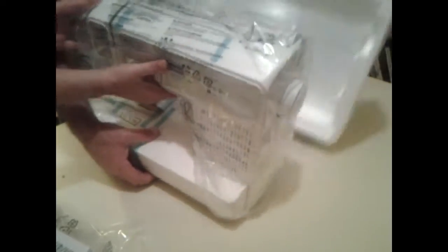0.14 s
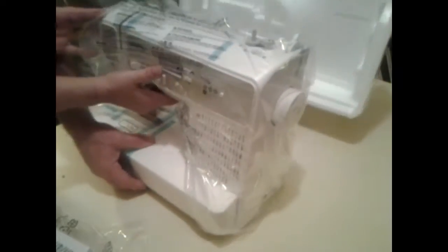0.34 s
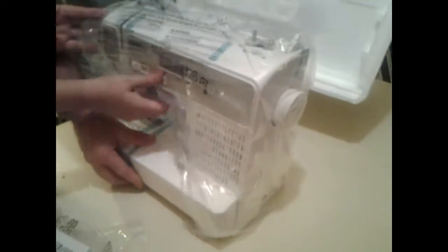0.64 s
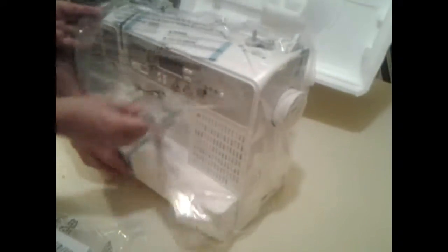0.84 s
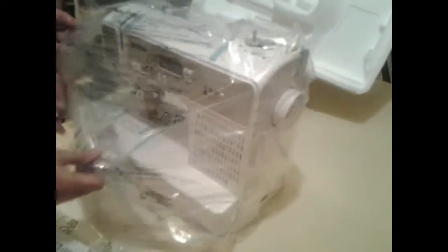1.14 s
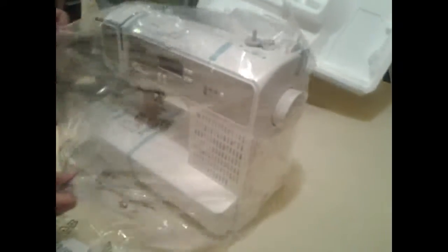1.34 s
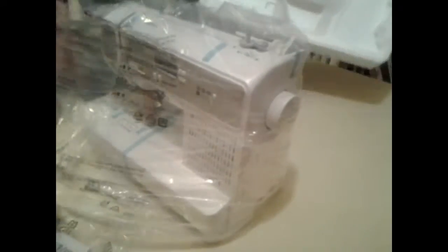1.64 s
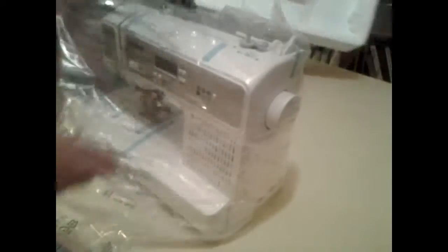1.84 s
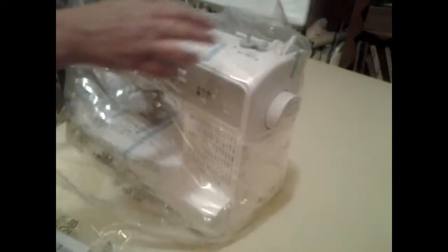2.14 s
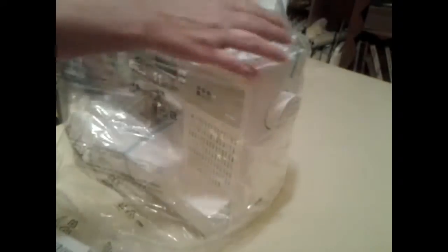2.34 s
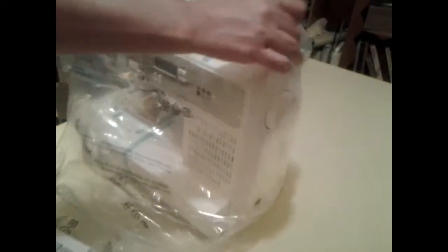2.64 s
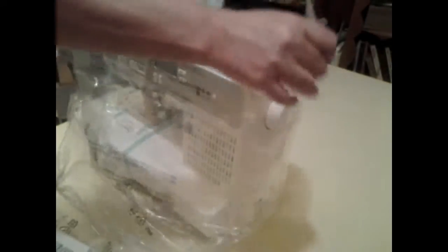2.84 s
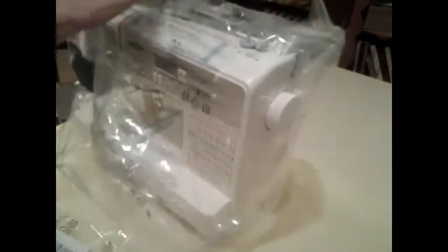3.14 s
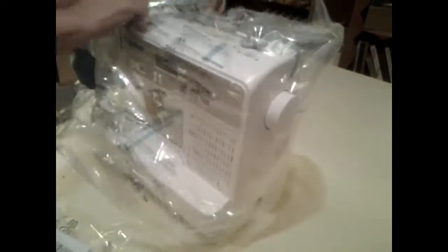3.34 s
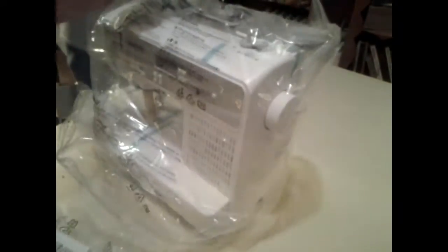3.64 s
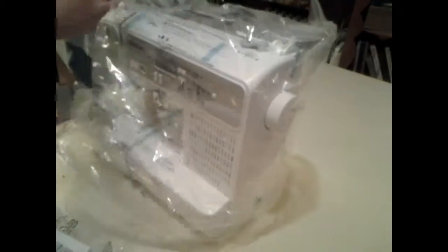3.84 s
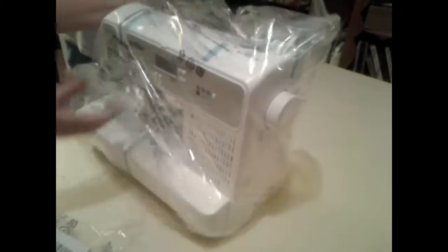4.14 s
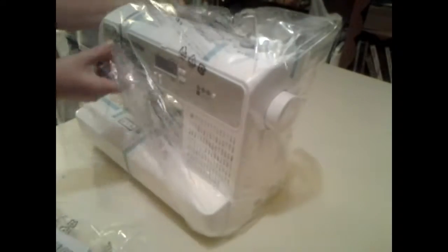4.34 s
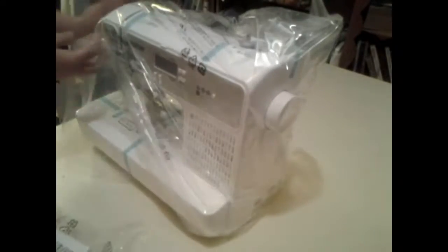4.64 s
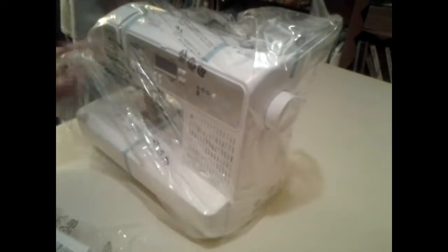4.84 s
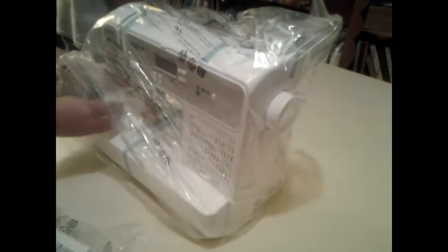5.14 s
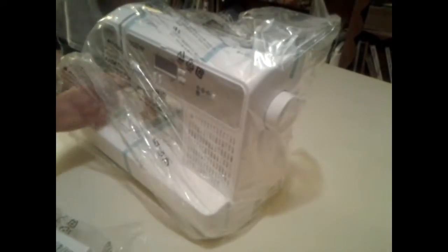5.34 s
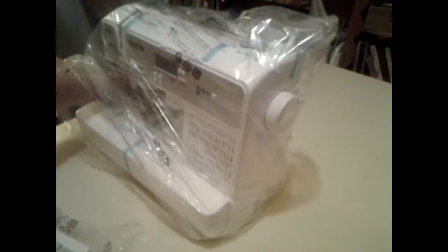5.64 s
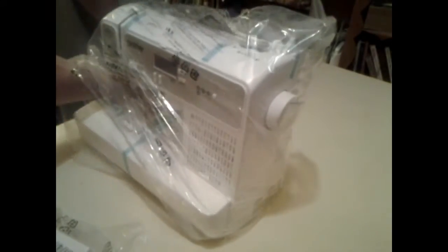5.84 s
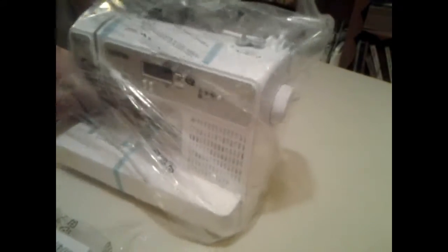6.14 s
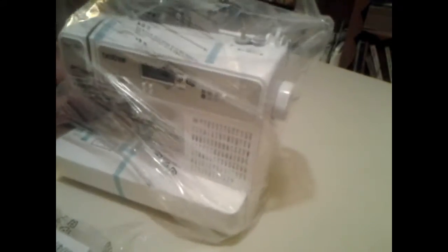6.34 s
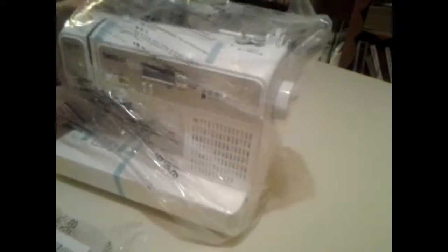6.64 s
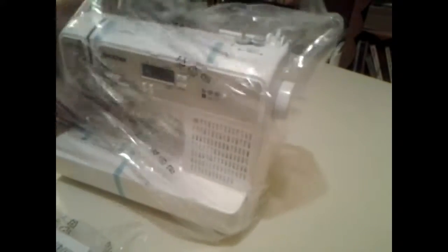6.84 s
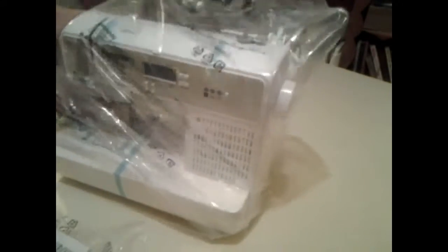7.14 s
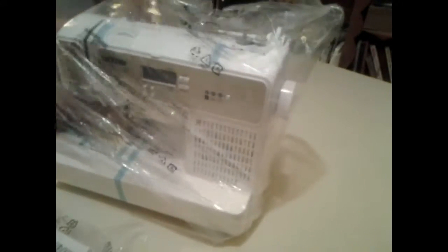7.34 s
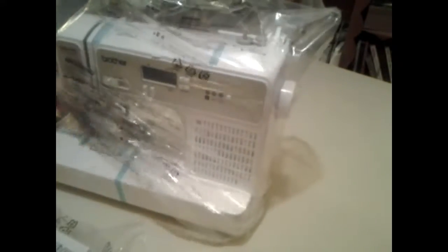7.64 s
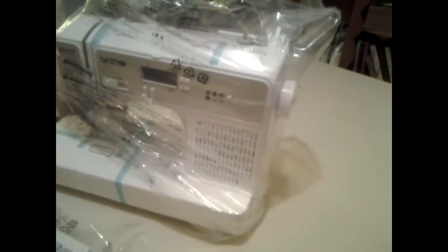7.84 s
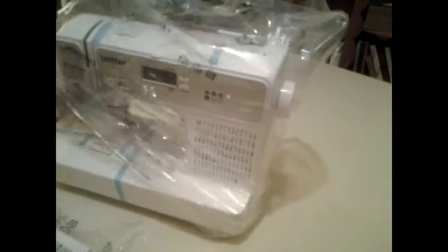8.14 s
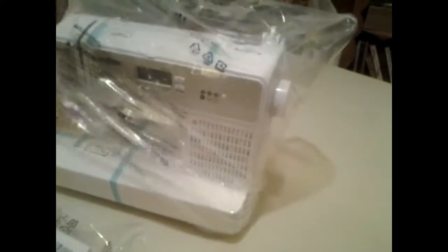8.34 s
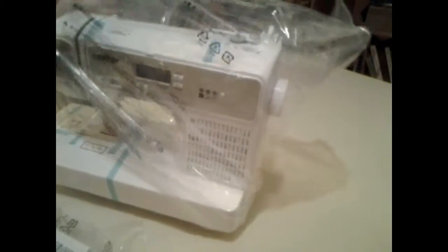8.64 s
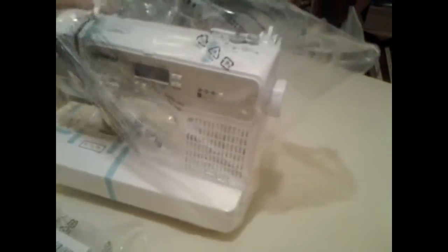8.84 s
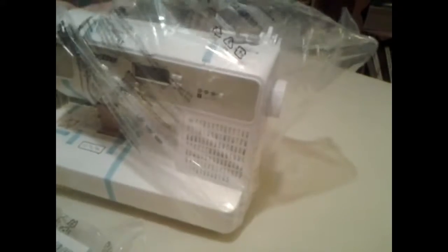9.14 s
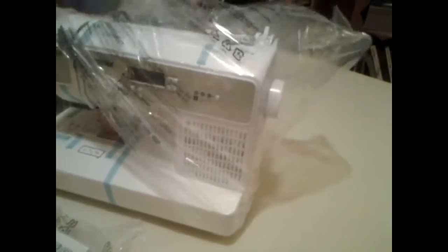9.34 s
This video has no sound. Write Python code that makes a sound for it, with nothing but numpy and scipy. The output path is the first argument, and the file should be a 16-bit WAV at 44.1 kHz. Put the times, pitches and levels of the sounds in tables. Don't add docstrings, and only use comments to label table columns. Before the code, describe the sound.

Hands tug a crinkly plastic bag off a heavy machine, its base thudding hollowly on the tabletop, ending with one loud taut pop.

```python
import sys
import numpy as np
from scipy import signal
from scipy.fft import rfft, irfft
from scipy.io import wavfile
from scipy.ndimage import uniform_filter1d

SR = 44100
rng = np.random.default_rng(int(sys.argv[2]) if len(sys.argv) > 2 else 0)


def amplitude_ratio(level_db):
    exponent = np.asarray(level_db, float) / 20
    return 10 ** exponent


def materialize(psi):
    bounded = np.clip(np.atleast_2d(psi).T, -1, 1)
    quanta = np.round(bounded * 32767).astype(np.int16)
    wavfile.write(sys.argv[1], SR, quanta)


N = 418950

# t/s, peak level/dB, deep modes/dB, upper modes/dB, hardness/dB
KNOCKS = [(0.119, -26.5, -33, 8, -1), (0.229, -13, -27, -15, -22), (0.234, -9.5, -7.5, -23, -12),
          (0.396, -30, 7, -4, -1), (4.013, -11.5, -14.5, -5, -25), (4.026, -9, -26, -9, -15),
          (4.398, -18, -15, -9, -27), (5.119, -5, -28.5, -15, -26), (5.151, -16.5, -39, 8, -20),
          (5.356, -7, -16.5, -3, -4.5), (5.380, -10.5, -28, -9, -16), (5.657, -26, -17, -2.5, -17),
          (6.162, -14.5, -22, -13.5, -28), (6.262, -0.5, -26, 2, -29), (6.274, 3.5, -29, -20, -19.5),
          (6.298, -16, -29, -13, -28), (6.947, -22.5, -4, -13, -24), (7.762, -2.5, -25, -13.5, -20.5),
          (7.775, -5, -29, -17, -20), (7.983, -12.5, -32, -16.5, -16), (7.996, -12, -31, -18, -36),
          (9.322, -25, -5, -18, 4), (9.336, -25, -14, -28, -6), (9.418, -32, -1.5, -9, -6)]
# f/Hz, level/dB, T60/s
TABLE = [(125, -14, 0.24), (185, -2.5, 0.065), (265.4, -1, 0.12), (323.6, -7, 0.24), (383.7, 4.5, 0.095),
         (446.2, 2.5, 0.18), (530, 0.5, 0.1), (608, 4.5, 0.081), (665.7, 2, 0.12), (744, 3.5, 0.033),
         (872, -0.5, 0.051), (1054, -10.5, 0.069), (1110, -24.5, 0.45), (1490, -25, 0.036)]


def band(x, hz, octaves):
    edges = np.clip(hz * 2 ** (np.array([-octaves, octaves]) / 2), 10, .45 * SR)
    return signal.sosfilt(signal.butter(2, edges, "bandpass", fs=SR, output="sos"), x)


def unit(x):
    return x / np.sqrt(np.mean(x ** 2))


def shape_db(points, hz):
    f, db = np.transpose(points)
    return np.interp(np.log(hz), np.log(f), db)


def walk(rate):
    k = int(SR / rate)
    steps = np.repeat(rng.standard_normal(N // k + 1), k)
    return unit(uniform_filter1d(uniform_filter1d(steps, k), k)[:N])


def ring(hz, db, t60, seconds):
    t = np.arange(int(seconds * SR))[:, None] / SR
    sign = (-1.) ** np.arange(len(hz))
    return sign * np.sin(2 * np.pi * hz * t) * amplitude_ratio(db - 60 * t / t60)


def add(out, s, x, db):
    i = int(s * SR)
    x = x[:N - i]
    out[i:i + len(x)] += x * amplitude_ratio(db) / np.abs(x).max()


def strokes(s, hold, db, rise_db_s, fall_db_s):
    t = np.arange(0, N, 64) / SR
    s, hold, db = (np.reshape(v, (-1, 1)) for v in (s, hold, db))
    before, after = np.maximum(s - t, 0), np.maximum(t - s - hold, 0)
    return amplitude_ratio(db - rise_db_s * before - fall_db_s * after) ** 2


def to_db(power):
    return np.interp(np.arange(N), np.arange(0, N, 64), 10 * np.log10(power + 1e-12))


def room_tone():
    # f/Hz, level/dB per Hz
    air_spectrum = [(12, -40), (20, -7), (65, -11), (239, -2.5), (662, 0), (2170, -9), (3660, -5),
                    (6000, -30), (9860, -17), (11300, -27), (14500, -81)]
    hz = np.maximum(np.fft.rfftfreq(N, 1 / SR), 1)
    air = unit(irfft(rfft(rng.standard_normal(N)) * amplitude_ratio(shape_db(air_spectrum, hz)), N))
    drone = unit(band(rng.standard_normal(N), 239.8, 0.058))
    return air * amplitude_ratio(-49) + drone * amplitude_ratio(-63)


def room(x):
    t60_s, tail_db = 0.33, -11
    t = np.arange(int(.5 * SR)) / SR
    noise = rng.standard_normal(len(t)) * np.minimum(t / 0.00036, 1)
    low = signal.sosfilt(signal.butter(1, 2500, fs=SR, output="sos"), noise)
    tail = low * amplitude_ratio(-60 * t / t60_s) + (noise - low) * amplitude_ratio(-60 * t / (1.47 * t60_s))
    return x + amplitude_ratio(tail_db) * signal.fftconvolve(x, tail / np.sqrt(np.sum(tail ** 2)))[:N]


def hum():
    s, db = np.transpose(KNOCKS)[:2]
    rocking = strokes(s + 0.027, 0.27, 2 * db - 45, 2000, 250).sum(axis=0)
    return unit(band(rng.standard_normal(N), 385, 0.092)) * amplitude_ratio(to_db(rocking))


def drag(film):
    # t/s, hold/s, deep level/dB, upper level/dB
    shove_events = [(0.145, 0.016, -31, -30), (0.324, .01, -37, -31.5), (0.398, 0.012, -36, -31),
                    (1.5, 0.018, -55, -35), (1.924, .02, -47, -54), (3.371, 0.018, -37, -33),
                    (3.68, .03, -39, -41), (3.737, 0.035, -51, -41), (3.837, .02, -34.5, -33.5),
                    (4.078, .04, -47, -31), (4.187, 0.04, -25.5, -26), (4.304, 0.12, -26.5, -38),
                    (4.413, 0.027, -25, -30), (4.498, 0.054, -38.5, -31.5), (4.743, 0.014, -46, -38),
                    (5.063, 0.023, -29.5, -28.5), (5.186, 0.02, -49, -28.5), (5.43, 0.034, -28.5, -31.5),
                    (5.67, 0.068, -40.5, -42), (6.186, 0.069, -37, -34), (6.463, 0.18, -58, -38.5),
                    (6.758, 0.037, -36, -31), (6.934, 0.024, -30, -28), (7.142, 0.055, -39, -32.5),
                    (7.672, 0.017, -36, -42), (7.862, 0.088, -26.5, -28.5), (7.98, 0.058, -28, -34),
                    (8.067, 0.05, -21, -27), (8.257, 0.064, -33.5, -30.5), (9.046, 0.052, -75, -32.5)]
    s, hold, deep_db, upper_db = np.transpose(shove_events)
    knock_s, knock_db = np.transpose(KNOCKS)[:2]
    rest = strokes(knock_s + 0.029, 0, knock_db, 2000, 169).sum(axis=0)
    slips = rng.standard_normal(N) * amplitude_ratio(1.8 * walk(90) + .6 * walk(20))
    hz, db, t60 = np.transpose(TABLE)
    modes = ring(hz, 0.7 * db, 0.2 * t60, .3)
    out = 0
    # its modes, shove dB, dB of the bag brushing the table, dB of the rocking
    parts = [(hz < 460, deep_db, -21.5, -23), (hz >= 460, upper_db, -20.5, -33.5)]
    for part, shove_db, bag_db, rest_db in parts:
        power = strokes(s, hold, shove_db, 700, 210).sum(axis=0)
        power = power + amplitude_ratio(bag_db) ** 2 * film + amplitude_ratio(rest_db) ** 2 * rest
        shake = unit(signal.fftconvolve(slips, modes[:, part].sum(axis=1))[:N])
        out = out + shake * amplitude_ratio(to_db(power) - 3.0)
    return out


def taps():
    # t/s, peak level/dB, f/Hz, T60/s
    tap_events = [(.122, -34, 690, .1), (0.144, -28.5, 260, 0.095), (.17, -26, 944, .06),
                  (.232, -19, 298, 0.11), (.29, -31, 347, 0.091), (.335, -38, 330, 0.054),
                  (.396, -23, 890, 0.048), (.45, -32, 755, .06), (.571, -44, 476, .05),
                  (.991, -39, 815, .05), (1.512, -36, 580, .06), (2.332, -35, 856, .05),
                  (3.68, -36, 650, .1), (3.746, -32, 610, 0.17), (4.057, -27, 417, .08),
                  (4.1, -36, 634, .08), (4.18, -20, 595, 0.068), (4.306, -28, 625, 0.058),
                  (4.368, -25, 425, 0.07), (4.402, -19, 668, 0.089), (4.418, -26, 423, 0.08),
                  (4.55, -30, 423, 0.077), (5.36, -17.5, 271, 0.11), (5.392, -23, 628, 0.073),
                  (5.44, -31, 477, 0.092), (5.495, -33, 540, 0.11), (5.554, -30, 549, 0.037),
                  (5.876, -39, 579, .06), (6.131, -33, 576, 0.075), (6.169, -17.5, 439, 0.12),
                  (6.285, -10.5, 385, 0.2), (6.309, -15.5, 267, 0.13), (6.923, -26, 444, 0.051),
                  (7.7749, -9.5, 402, .1), (7.795, -15.5, 590, 0.051), (7.985, -19, 656, 0.065),
                  (8.003, -9.5, 446, 0.16), (8.029, -16, 442, 0.083), (8.1, -21.5, 449, 0.068),
                  (8.25, -24.5, 565, .1), (8.266, -22, 598, 0.059), (8.296, -23, 577, 0.055),
                  (8.741, -33, 587, 0.072), (9.164, -33, 759, .05), (9.324, -23, 930, 0.045),
                  (9.338, -26.5, 318, 0.067),
                  (3.69, -27, 2280, 0.089), (3.681, -26, 3990, 0.055), (3.769, -22, 4170, 0.05),
                    (3.763, -28, 3280, 0.054), (5.125, -25, 1400, 0.072), (5.365, -19, 1553, .06),
                    (5.366, -19, 3240, 0.034), (5.372, -21, 2600, .04), (5.378, -24, 3880, .03),
                    (5.385, -17, 976, .05), (6.27, -22, 1600, .06), (9.334, -29, 1260, .07),
                    (9.375, -32, 590, .05), (.44, -45, 123.5, .3), (1.069, -48, 151, 0.1),
                    (1.14, -48, 104, .15), (1.88, -45, 115, .15), (2.09, -51, 115, .12),
                    (2.899, -52, 116, .12), (3.69, -46, 109, 0.18), (5.95, -48, 111, 0.17),
                    (7.4, -45.5, 115, .15), (8.501, -47, 110, 0.13), (8.719, -47, 111, .15),
                  (.1205, -29, 954, 0.053), (.229, -15.5, 564, 0.021), (.571, -42, 1510, .02),
                  (3.9, -40, 750, .1), (3.95, -46, 800, .08), (4.012, -19, 630, .06),
                  (4.152, -28.5, 400, .12), (5.128, -8, 435, 0.087), (6.172, -24, 554, 0.087),
                  (6.267, -19, 713, .05), (6.274, -8, 557, 0.082), (9.323, -25, 1040, .04),
                  (8.31, -32, 380, 0.11), (7.58, -44, 272, 0.063), (7.675, -33, 380, .08),
                  (7.7625, -7, 640, 0.042), (7.89, -23.5, 614, .1), (7.985, -27, 950, .06),
                  (9.335, -25, 1270, .05), (9.417, -30.5, 250, 0.07)]
    rise_s = 0.0019
    out = np.zeros(N)
    t = np.arange(int(.25 * SR)) / SR
    for s, db, hz, t60 in tap_events:
        pair = ring(hz * np.array([1, 1.07]), np.array([0, -9]), t60 * np.array([1, .6]), .25)
        add(out, s, pair.sum(axis=1) * (1 - np.exp(-t / rise_s)), db)
    return out


def knocks():
    first_settle_s, next_settle_s = 0.017, 0.0078
    out = np.zeros(N)
    hz, mode_db, t60 = np.transpose(TABLE)
    modes = ring(hz, 0, t60, .3)
    t = np.arange(int(.1 * SR)) / SR
    follows = np.diff(np.array(KNOCKS)[:, 0], prepend=-1) < .04
    for (s, db, deep_db, upper_db, hard_db), second in zip(KNOCKS, follows):
        luck = rng.standard_normal((2, len(t)))
        settle = next_settle_s if second else first_settle_s
        blows = luck[0] * np.exp(-t / settle) * (.6 + t / settle)
        blows[:20] += amplitude_ratio(.3 * db + 13) * np.hanning(20)
        body = signal.fftconvolve(blows[:, None], modes, axes=0)
        place_db = np.where(hz < 230, deep_db + 18, np.where(hz > 500, upper_db + 12.0, 0))
        place_db = place_db + 2.4 * luck[1, :len(hz)]
        add(out, s, (body / np.abs(body).max(axis=0)) @ amplitude_ratio(mode_db + place_db), db + 1.5)
        add(out, s, band(blows, 2000, 1.6), db + hard_db - 10)
    return out


def ticks():
    # t/s, peak level/dB
    tick_events = [(0.1396, -30), (0.5701, -37), (0.7597, -36), (0.9872, -28), (1.2161, -32), (1.3154, -22),
                   (1.4371, -32), (1.9669, -30), (2.0238, -26), (2.1026, -31), (2.2877, -37), (2.5471, -39),
                   (2.6209, -34), (2.7077, -32), (3.3318, -29), (3.3473, -26), (3.6755, -29), (4.0946, -18),
                   (4.1809, -21), (4.4039, -28), (4.6194, -28), (4.7351, -27), (4.8279, -27), (5.9, -35),
                   (6.8688, -34), (7.4574, -45)]
    out = np.zeros(N)
    t = np.arange(400) / SR
    spits = rng.standard_normal((len(tick_events), len(t)))
    for (s, db), spit in zip(tick_events, spits):
        add(out, s, band(spit * np.exp(-t / 0.0013), 7500, 1.35), db)
    return out


def snaps():
    # t/s, peak level/dB, f/Hz
    snap_events = [(0.0941, -33, 2930), (0.1185, -17, 3120), (0.363, -31, 3540), (0.5695, -37, 3760),
                   (0.6513, -37, 3580), (0.86, -22, 3500), (0.9202, -26, 3090), (1.1143, -22, 3270),
                   (1.1694, -24, 3190), (1.1807, -21, 3560), (1.1991, -19, 4000), (1.2172, -19, 3610),
                   (1.3713, -9, 3530), (1.383, -11, 3600), (1.5203, -9.5, 3910), (1.6396, -23, 3990),
                   (1.722, -21, 3680), (1.7543, -17, 3600), (1.8411, -27, 3670), (1.877, -19, 3530),
                   (1.91, -12, 3900), (1.9608, -25, 3450), (2.2871, -25, 3200), (2.334, -20, 3430),
                   (2.786, -27, 3470), (3.3372, -24, 3400), (3.678, -26, 4000), (3.6839, -18, 3930),
                   (3.6964, -14, 3520), (3.7458, -19, 3570), (3.7648, -12, 3540), (4.0112, -26, 3610),
                   (4.08, -18, 3120), (5.1976, -16, 3450), (5.3127, -27, 3180), (5.3447, -19, 3450),
                   (5.3602, -13, 3600), (5.3704, -17, 2090), (5.438, -17, 4100), (5.65, -28, 4090),
                   (5.903, -26, 3830), (6.723, -23, 3610), (6.8693, -22, 3320), (7.448, -31, 3550),
                   (7.5531, -21, 3430), (7.6348, -20, 3440), (7.8649, -24, 3600), (7.9193, -26, 3500),
                   (7.9964, -10, 3460), (8.0749, -12.5, 3450), (8.3508, -23, 3470), (8.462, -19, 3470),
                   (8.8297, -19, 3400), (9.2862, -35, 3320), (9.3336, -23, 3270)]
    tone_db = np.array([2.5, 2, -7.5, -7.5])
    t60_s = .007 * np.array([1, .8, 0.53, 0.37])
    out = np.zeros(N)
    spreads = rng.uniform(size=(len(snap_events), 3))
    for (s, db, hz), spread in zip(snap_events, spreads):
        ratios = np.array([.92, 1.12 + 0.14 * spread[0], 1.38 + 0.4 * spread[2], 1.93 + 1.45 * spread[1]])
        add(out, s, ring(hz * ratios, tone_db, t60_s, .02).sum(axis=1), db - 3.5)
    return out


def pop():
    # t/s, peak level/dB, length/s
    pop_event = (9.4065, -2.5, .0018)
    # f/Hz, level/dB
    pop_partials = [(2650, 0), (4450, 2), (7400, -16), (9000, -17)]
    s, peak_db, length_s = pop_event
    hz, db = np.transpose(pop_partials)
    t = np.arange(int(length_s * SR))[:, None] / SR - length_s / 2
    crack = np.sqrt(np.hanning(len(t))) * (-np.cos(2 * np.pi * hz * (t + .0004)) @ amplitude_ratio(db))
    out = np.zeros(N)
    add(out, s, crack, peak_db)
    add(out, s + .002, band(np.pad(crack, (0, 99)), 2800, 1), peak_db - 17)
    return out


def hands():
    # t/s, hold/s, crinkle level/dB, crispness/dB
    pull_events = [(0.0, 0.029, -36.5, -13), (0.119, 0.27, -35.5, -15), (0.456, 0.064, -45.5, -12),
                   (0.683, 0.031, -39, -13), (0.754, 0.12, -36.5, -11.5), (0.922, 0.16, -33.5, -14),
                   (1.145, 0.43, -31.5, -14.5), (1.628, 0.15, -34.5, -17.5), (1.817, 0.037, -41, -21),
                   (1.928, 0.22, -36, -14), (2.218, .08, -42.5, -12), (2.364, 0.056, -38, -22),
                   (2.57, 0.02, -45, -5), (2.714, 0.21, -33, -13), (2.813, .19, -33, -14.5),
                   (3.118, 0.094, -32, -14), (3.237, 0.19, -32.5, -15), (3.452, 0.088, -43.5, -11),
                   (4.253, 0.31, -29, -12.5), (4.62, 0.11, -34, -14), (4.844, 0.13, -38.5, -17),
                     (5.078, 0.15, -32, -15), (5.752, 0.052, -36, -13), (5.916, 0.12, -34, -16),
                     (6.156, 0.14, -31.5, -13), (6.28, 0.096, -27.5, -8), (6.37, 0.18, -26.5, -13),
                     (6.65, 0.31, -35, -18), (6.864, 0.1, -26, -12.5), (6.988, 0.26, -29.5, -13.5),
                     (7.298, 0.11, -32.5, -19), (7.548, 0.097, -38, -13), (7.66, 0.14, -33.5, -13.5),
                     (7.871, 0.066, -27, -12.5), (7.994, 0.29, -35, -15.5), (8.189, 0.16, -29.5, -16),
                     (8.437, .17, -30, -15), (8.699, 0.19, -30.5, -16.5), (8.946, 0.15, -32.5, -11.5),
                     (9.169, 0.04, -33, -16), (9.25, .03, -46, -12)]
    # t/s, hold/s, crinkle level/dB, crispness/dB
    abrupt_pulls = [
        (0.583, 0.051, -60, -16),
        (1.89, 0.12, -33, -18),
        (2.281, 0.096, -37.5, -12.5),
        (3.681, 0.3, -33, -15),
        (4.007, 0.19, -28, -12.5),
        (5.341, 0.22, -36.5, -13.5),
        (5.663, 0.11, -47, -15),
        (9.283, 0.27, -35, -15),
                    (.571, .01, -36, -7),
        (2.547, .01, -43, -9),
        (7.448, .016, -28.5, -22),
    ]
    # t/s, crinkle level/dB
    twitch_events = [(.24, -34), (.4, -51), (.87, -36), (.98, -31), (1.22, -31.5), (1.36, -33),
                     (1.435, -29.5), (1.53, -29.5), (1.645, -33.5), (1.771, -32.5), (1.93, -30), (.77, -36),
                     (2.13, -36.5), (2.29, -46), (2.34, -48), (2.89, -31), (3.342, -28.5), (3.684, -33.5),
                     (3.762, -29.5), (4.11, -26), (4.195, -27), (4.31, -32), (4.545, -30), (4.775, -30.5),
                     (5.218, -29.5), (5.362, -35.5), (7.234, -27), (2.03, -40), (7.652, -27.5), (8.44, -40),
                     (5.585, -35.5), (5.49, -39), (3.76, -29.5), (4.735, -30.5), (1.6, -37), (2.545, -38.5),
                     (3.7, -34), (7.458, -37), (5.45, -37)]
    smooth, abrupt = pull_events, abrupt_pulls
    s, hold, db, crisp_db = np.transpose(smooth + abrupt)
    rise_db_s = np.repeat([127, 2500], [len(smooth), len(abrupt)])[:, None]
    pulls = strokes(s, hold, db, rise_db_s, 226)
    s, db = np.transpose(twitch_events)
    twitches = strokes(s, .018, db, 700, 462).sum(axis=0)
    film = pulls.sum(axis=0) + twitches
    crisp = (amplitude_ratio(crisp_db) ** 2 @ pulls + amplitude_ratio(-12) ** 2 * twitches) / film
    s, db, _, _, hard_db = np.transpose(KNOCKS)
    rattle = strokes(s + 0.0067, 0.005, db + hard_db - 5, 2200, 348).sum(axis=0)
    return film, crisp, amplitude_ratio(-11) ** 2 + rattle / film


def crinkle(level_db, crisp_db, full_db):
    # f/Hz, level/dB per Hz
    film_spectrum = [(120, -48), (200, -33.5), (324, -3), (388, -15.5), (425, -9.5), (576, -6.5),
                     (753, -2.5), (1220, -11.5), (1690, 2), (1950, -16), (3330, 7), (3780, -4),
                     (4800, -16.5), (6240, -18.5), (10300, -26.5), (14500, -58.5)]
    creases_per_s = 2500
    count = int(creases_per_s * N / SR)
    at = rng.integers(0, N, count)
    size = rng.choice([-1, 1], count) * amplitude_ratio(np.minimum(2.6 * rng.exponential(size=count), 12))
    octave = rng.uniform(np.log2(150), np.log2(16000), count)
    flurry_db = 0.84 * walk(22) + 1.22 * walk(70)
    out = np.zeros(N)
    for hz in 220 * 2 ** np.arange(0, 6.1, 1 / 3):
        clicks = np.bincount(at, size * np.exp(-((np.log2(hz) - octave) / 2.25) ** 2), N)
        grain = unit(band(clicks, hz, .5)) + .6 * unit(band(rng.standard_normal(N), hz, .5))
        crisp = np.clip(np.log2(hz / 5000), 0, 1)
        full = np.clip(np.log2(2400 / hz), 0, 1)
        db = shape_db(film_spectrum, hz) + 10 * np.log10(hz / 3500)
        db = db + crisp * crisp_db + full * full_db
        out += grain * amplitude_ratio(db + flurry_db + 1.52 * walk(12))
    return out * amplitude_ratio(level_db - 6.0)


def scene():
    power, crisp, full = hands()
    film = crinkle(to_db(power), to_db(crisp) + 25.0, to_db(full) + 12.5) + snaps() + ticks()
    table = knocks() + taps() + drag(power) + hum()
    return (room(film + 0.21 * table) + 0.55 * table + pop())[None]


def thin_treble(x):
    # f/Hz, share/1
    kept_share = [(5000, 1), (7000, .93), (8500, .96), (10800, .93), (11800, .72), (13000, .42),
                  (14300, .18), (14750, .1), (14800, 0)]
    bass_spared_db, bass_dip_db = 3, -25
    hop, lead = 1024, 602 + 1024
    n, k = np.arange(2 * hop)[:, None], np.arange(hop)
    window = np.sin(np.pi * (n + .5) / (2 * hop))
    basis = window * np.cos(np.pi / hop * (n + .5 + hop / 2) * (k + .5))
    basis, x = basis.astype(np.float32), x.astype(np.float32)
    blocks = np.pad(x, (lead, 2 * hop - (lead + N) % hop)).reshape(-1, hop)
    frames = (np.hstack([blocks[:-1], blocks[1:]]) @ basis).T / hop
    count = frames.shape[1]
    hz = (k + .5) * SR / (2 * hop)
    treble_db = 10 * np.log10(np.mean(frames[hz > 8000] ** 2, axis=0) + 1e-18)
    thrift_db = np.maximum(4 - np.abs(treble_db - np.median(treble_db) - 1), -3)
    thrift = amplitude_ratio(thrift_db + 4 * rng.standard_normal(count))
    chance = np.repeat(rng.uniform(size=(len(hz) // 8 + 1, count)), 8, axis=0)[:len(hz)]
    chance = chance[:, np.arange(count) // 2 * 2]
    narrow, wide = (np.repeat(rng.uniform(size=(hop // width, count)), width, axis=0) for width in (2, 16))
    patches = np.minimum(np.maximum(chance, wide) ** 2, 25 * narrow)
    chance = np.where(hz[:, None] > 10900, patches, chance)
    kept = 1. * (chance < np.interp(hz, *np.transpose(kept_share))[:, None] ** thrift)
    bass_db = 10 * np.log10(np.mean(frames[3:6] ** 2, axis=0) + 1e-18) + 3 * rng.standard_normal(count)
    over_db = bass_db - np.median(bass_db) - bass_spared_db
    kept[1:6] = amplitude_ratio(bass_dip_db / (1 + amplitude_ratio(2 * over_db)))
    halves = 2 * (basis @ (frames * kept).astype(np.float32)).T.astype(float)
    return (halves[1:, :hop] + halves[:-1, hop:]).ravel()[lead - hop:lead - hop + N]


def low_pass(x):
    return signal.sosfilt(signal.butter(12, 15090, fs=SR, output="sos"), x)


def record(dry):
    bass_cut = signal.butter(4, 112, "highpass", fs=SR, output="sos")
    x = signal.sosfilt(bass_cut, dry[0])
    x = signal.sosfilt(bass_cut, x / (1 + np.abs(x / .78) ** 4) ** .25)
    x = x / (1 + np.abs(x / 1.05) ** 8) ** .125
    mix = thin_treble(x + room_tone() - .0004)[None]
    return low_pass(mix)


dry = scene()
out = record(dry)
materialize(out)
```